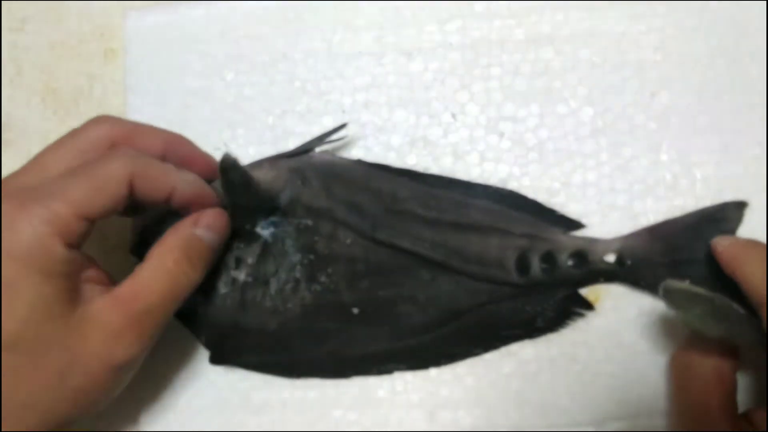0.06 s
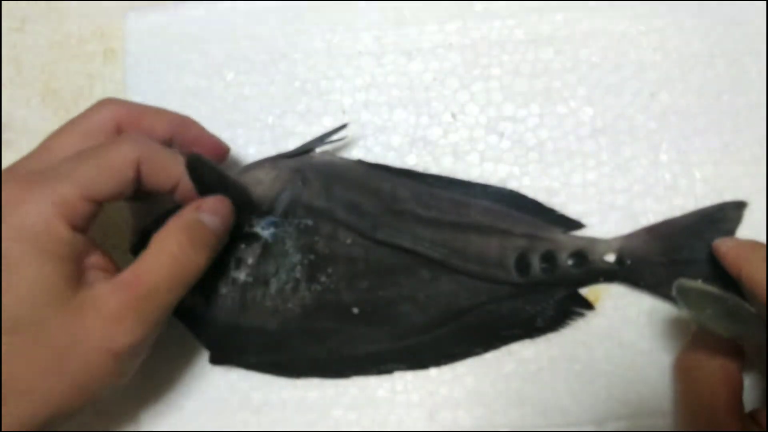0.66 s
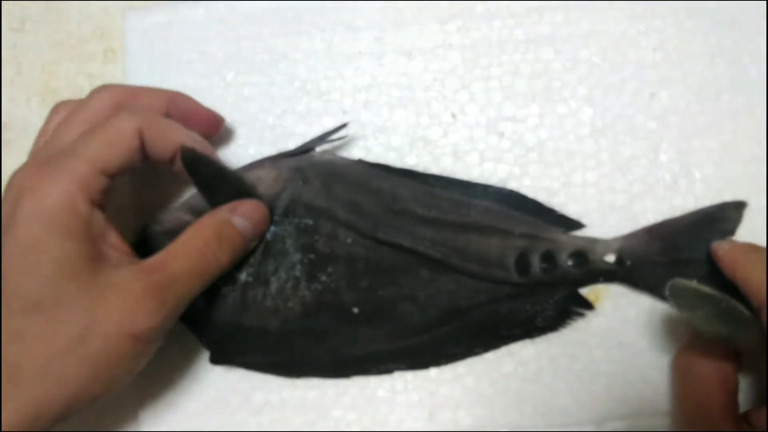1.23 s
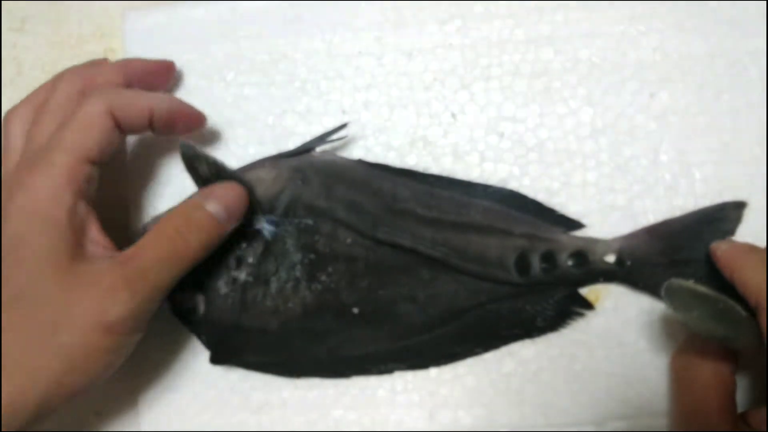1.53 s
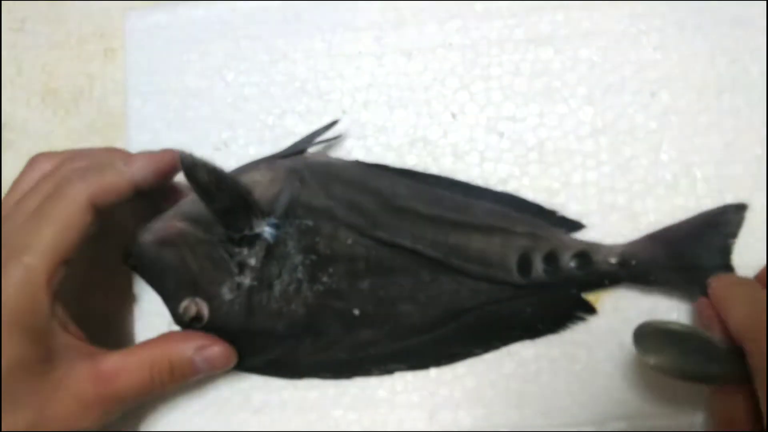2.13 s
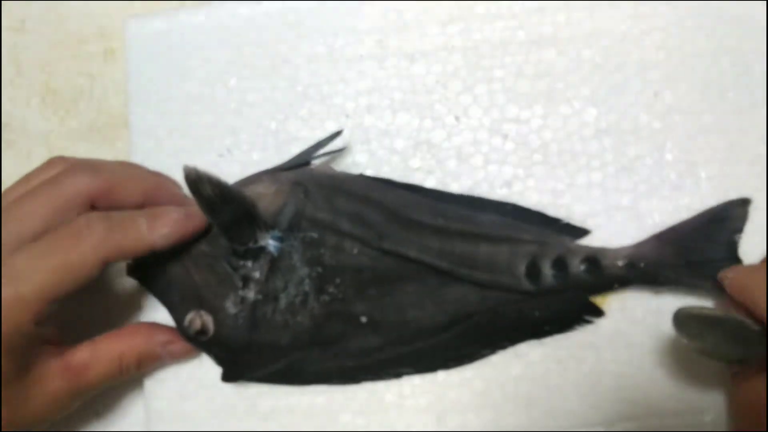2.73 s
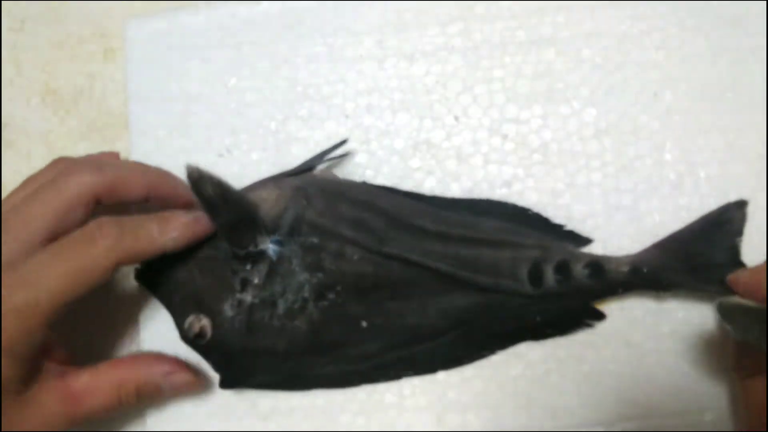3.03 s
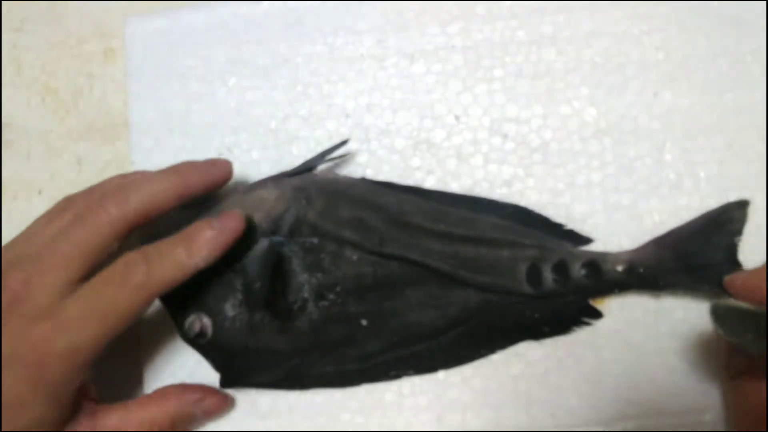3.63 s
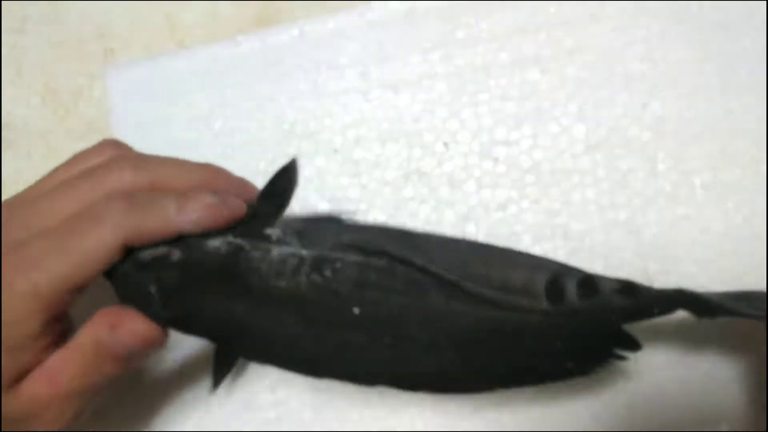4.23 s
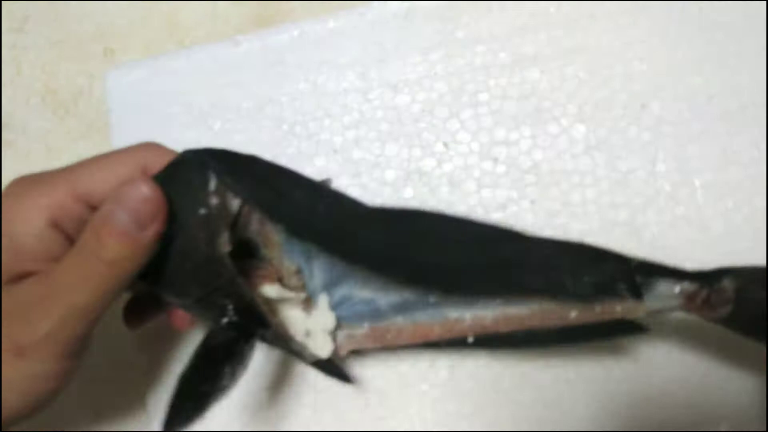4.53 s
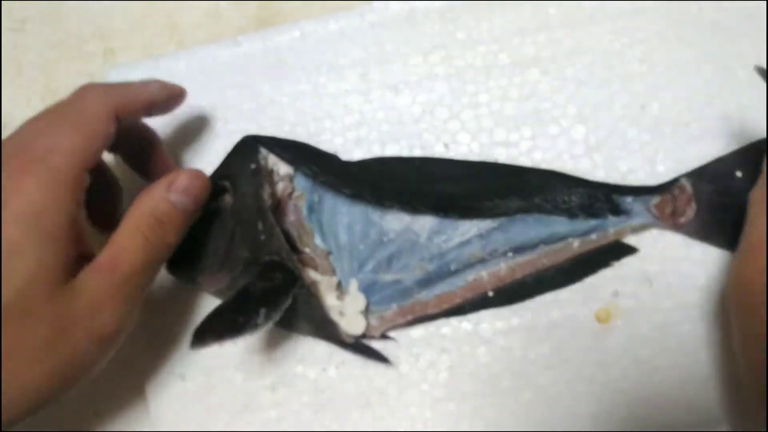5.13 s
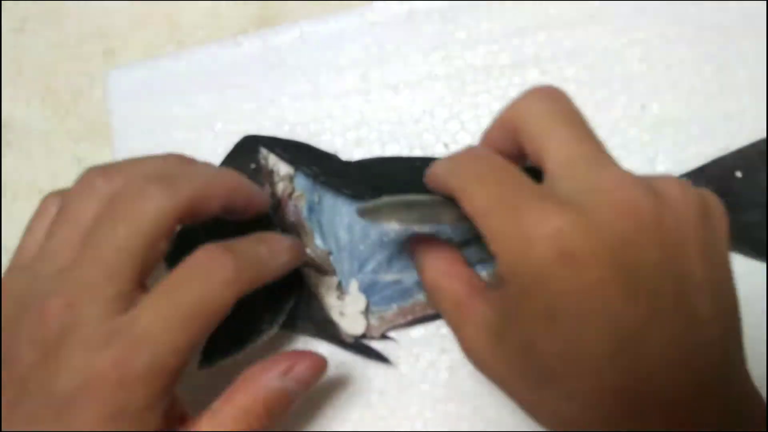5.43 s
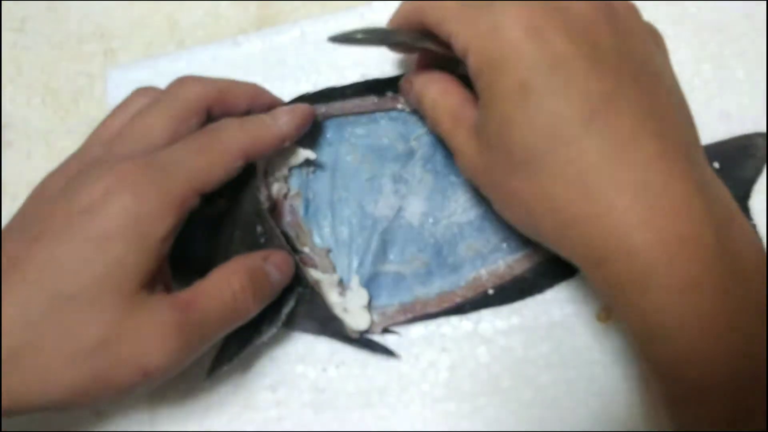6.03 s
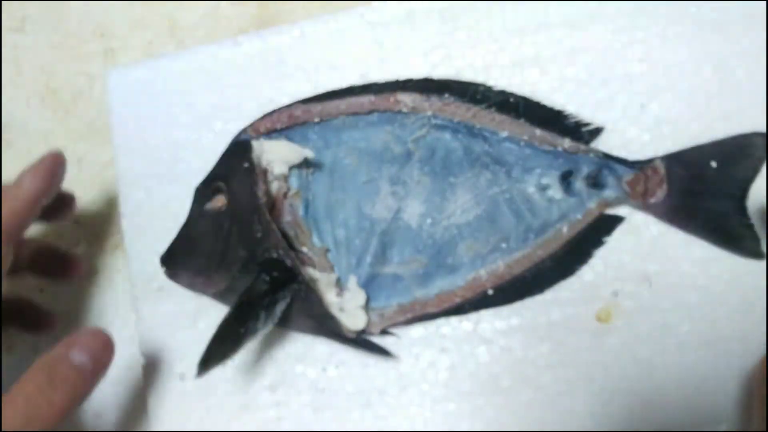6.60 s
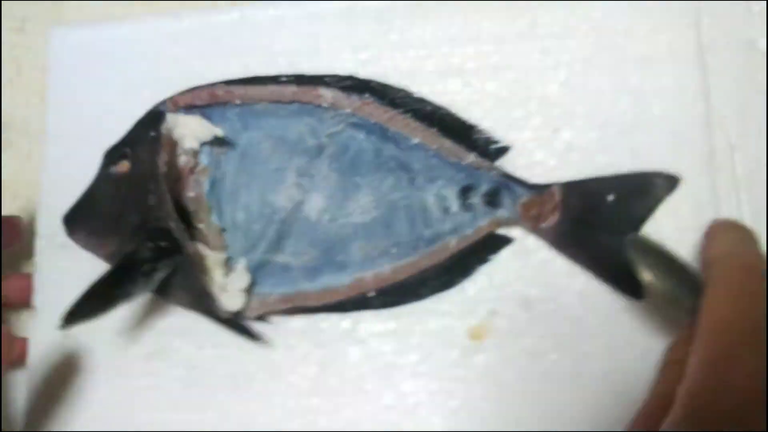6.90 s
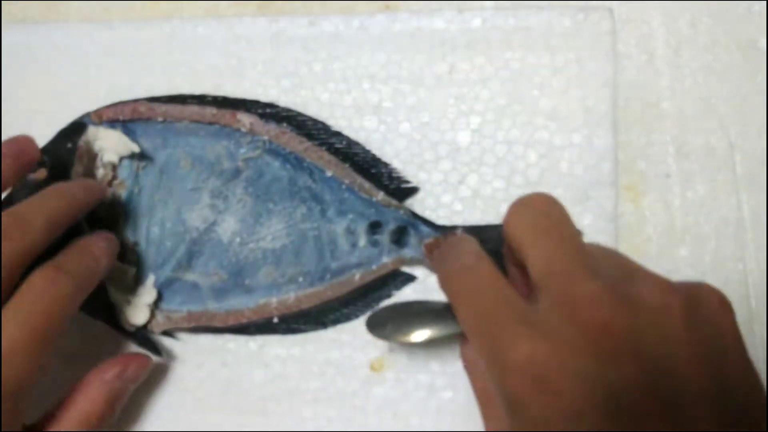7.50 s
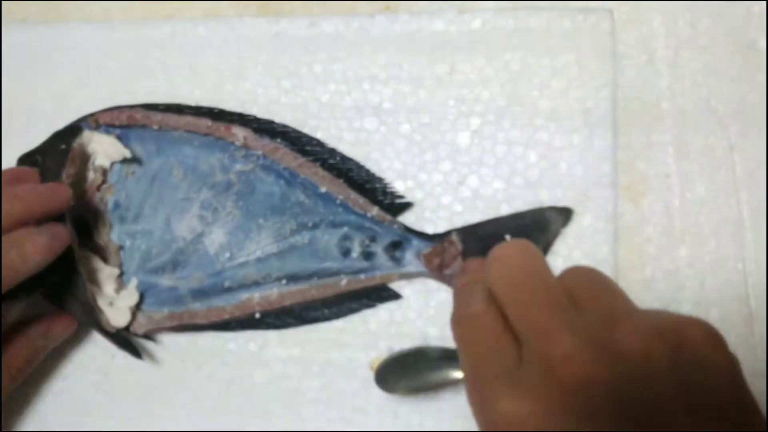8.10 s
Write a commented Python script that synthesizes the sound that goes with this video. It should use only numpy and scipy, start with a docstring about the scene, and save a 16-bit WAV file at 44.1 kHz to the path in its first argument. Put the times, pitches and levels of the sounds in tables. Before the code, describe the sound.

In a small, quiet room, fingers rub the sandpapery skin of a fish lying on a foam board, making short, high, crackly rasps. Fins and wet flesh give sharp ticks as it is turned over. Near the end the board is shoved across the counter with a louder gritty scrape and faint squeaks, then the rubbing resumes. The sounds are close, over soft room air, low rumble and a faint hum.

```python
"""Handling a fish on a foam board

In a small, quiet room, fingers rub a fish's sandpapery skin and flip it over. Fins and wet flesh tick,
and the foam board is shoved across the counter, squeaking now and then. Each rub or shove is a shower
of tiny slips that hiss and make the foam ring. Room air, a low rumble and a faint hum lie beneath."""
import sys
import numpy as np
from scipy import signal
from scipy.fft import rfft, irfft, next_fast_len
from scipy.io import wavfile
from scipy.ndimage import uniform_filter1d, map_coordinates

SR = 44100
rng = np.random.default_rng(int(sys.argv[2]) if len(sys.argv) > 2 else 0)


def put_to_file(sound):
    """Save the sound as 16-bit audio at rate SR, in the file named by the first command-line argument."""
    columns = np.atleast_2d(sound).T  # one column per channel
    safe = np.clip(columns, -1, 1)
    whole_steps = np.round(safe * 32767)
    wavfile.write(sys.argv[1], SR, whole_steps.astype(np.int16))


N = 368235

# Finger strokes; a harder press brings out more foam
# (start [s], length [s], rasp level [dB], foam compared with rasp [dB])
FINGER_RUBS = [(0.0, 0.052, -70, -4), (0.115, 0.138, -66, -5), (0.832, 0.075, -68.5, 0.5),
               (0.928, 0.061, -57.5, -2.0), (1.016, 0.056, -52.5, -4.5), (1.095, 0.039, -49, -4.5),
               (1.162, 0.13, -64, -1.5), (1.581, 0.039, -45, -13.5), (1.768, 0.033, -55, -7),
               (1.883, 0.089, -48, -8.5), (1.92, 0.21, -48.5, -7.5), (2.044, 0.021, -37.5, -12.5),
               (2.156, 0.088, -53, -7.5), (2.25, 0.24, -55.5, -5), (2.526, 0.032, -48, -5.5),
               (2.557, 0.13, -52.5, -6.5), (2.77, 0.13, -63, -5), (2.902, 0.054, -57.5, -0.5),
               (2.994, 0.12, -58.5, -11), (3.104, 0.039, -52.5, -3), (3.139, 0.129, -49.5, -6.0),
               (3.283, 0.087, -57.5, -1.5), (3.352, 0.02, -46.5, -8.5), (3.561, 0.039, -68.5, 1),
               (3.687, 0.17, -59.5, -3), (3.811, 0.071, -50.5, -6.0), (3.88, 0.11, -48, -5),
               (3.99, 0.19, -56, -6), (4.204, 0.057, -48, -8.5), (4.289, 0.031, -38.5, -14),
               (4.31, 0.051, -50.5, -7), (4.415, 0.028, -63.5, -10), (4.578, 0.032, -65, -30),
               (4.741, 0.053, -66, -7.5), (4.818, 0.088, -53, -8.0), (4.893, 0.26, -52, -2.0),
               (5.005, 0.2, -39.5, -11.5), (5.385, 0.017, -67, -19), (5.612, 0.13, -62, -4),
               (5.74, 0.49, -59.5, -5), (6.085, 0.2, -48.5, -5), (6.222, 0.064, -46.5, -24),
               (6.27, 0.095, -53.5, -4.5), (6.355, 0.081, -46.5, -11.5), (7.29, 0.18, -73, 4),
               (7.41, 0.092, -63, 1.5), (7.525, 0.1, -50.5, -5.5), (7.624, 0.089, -47, -6),
               (7.728, 0.12, -51.5, -6), (7.868, 0.12, -53, -6), (7.992, 0.104, -47.5, -5),
               (8.12, 0.19, -58.5, -5.5)]
# Pushes of the board over the counter
# (start [s], length [s], grit level [dB], foam compared with grit [dB], bending compared with foam [dB])
BOARD_SHOVES = [(2.366, 0.061, -39.5, -4.5, -25), (6.685, 0.026, -39.5, -9, -13.5),
                (6.733, 0.048, -33, -9.5, -17.5), (6.816, .1, -30.5, -9.5, -19.5),
                (6.9, 0.15, -30.5, -12, -19.5), (7.051, 0.12, -34, -15, -9), (7.153, 0.068, -34, -9, -21)]
# Fins flicking, wet flesh letting go, foam breaking loose
# (time [s], level [dB], foam knock compared with level [dB], time to fade by 60 dB [s])
SHARP_TICKS = [(0.990, -40, -12, .007), (1.586, -38, -15, .06), (1.6105, -23, -13, 0.0037),
               (1.636, -25, -23, .007), (1.783, -36.5, -8, .015), (1.864, -37, -8, 0.075),
               (1.904, -26, -10, 0.076), (2.054, -28, -20, .03), (2.062, -22, -7.5, .007),
               (2.543, -37, -10, .05), (2.9, -35, -10, .007), (3.058, -36, -22, .007),
               (3.115, -32, -7, 0.016), (3.371, -21, -16, 0.009), (3.602, -45, -12, .007),
               (3.713, -37, -7, 0.032), (4.298, -22, -16, 0.057), (4.31, -18, -13, 0.011),
               (4.616, -40, -24, .007), (4.785, -43, 1, .007), (5.384, -35.5, -18, 0.014),
               (5.529, -39, -19, 0.098), (5.606, -40, -23.5, 0.0076), (5.973, -35, -11, .009),
               (6.694, -21.5, -20, 0.096), (6.744, -24, -11, .05), (6.9527, -14, -28, .003),
               (7.108, -22, -27, 0.014), (7.414, -30.5, 2, 0.013), (7.426, -25, -14, .007)]
# The foam catching and squeaking (start [s], pitch [Hz], length [s], level [dB])
FOAM_SQUEAKS = [(1.581, 2520, 0.078, -58), (1.905, 2470, 0.01, -51), (2.02, 2560, 0.017, -50.5),
                (2.18, 1710, 0.031, -54.5), (4.22, 1445, 0.041, -56), (4.31, 1114, 0.05, -56.5),
                (6.131, 1750, 0.057, -57), (6.691, 1104, 0.027, -51), (6.81, 950, 0.04, -54),
                (7.023, 993, 0.038, -46.5), (7.028, 786, 0.17, -54.5), (7.183, 1084, 0.056, -46.5),
                (8.033, 1315, 0.071, -48.5), (8.04, 2184, 0.063, -52.5)]

# The tone of each sound: how strong it is from low to high (frequency [Hz], relative level [dB])
SKIN_TONE = [(3530, -49), (6000, -13.5), (6690, -20.5), (8360, -12.5), (10300, -7), (11300, -0.5),
             (11800, 0), (14000, -11.5), (15200, -12), (15800, -26.5)]  # rasping skin
GRIT_TONE = [(3530, -62), (6000, -20.5), (6560, -29.5), (7030, -18.5), (8640, -15), (10400, -7), (11700, 1),
             (14000, -11.5), (15200, -11), (15800, -29)]  # foam scraping the counter
PRESSED_FOAM_TONE = [(500, -15), (850, -8.5), (1150, 1), (1700, 0.5), (2000, -3), (2350, 0.5), (3100, -3.5),
                     (4200, -4), (5000, -4.5), (5800, -11), (6600, -9.5), (9000, -30)]  # the sheet under the fingers
SLIDING_FOAM_TONE = [(550, -27), (700, -21), (790, -0.5), (950, -2.5), (1100, -0.5), (1650, 2), (2050, -1),
                     (2400, 0.5), (4200, -1.5), (4900, -1), (5900, -8), (6600, -11), (9000, -32)]  # the sheet sliding freely
BENDING_TONE = [(110, -13.5), (230, -5), (340, 0), (480, -5), (680, -6.5), (1100, -19)]  # the whole board bending
AIR_TONE = [(76, -44.5), (130, -9), (169, 1), (263, -4), (296, -5.5), (362, -8), (452, -7), (746, -10.5),
            (792, -10), (1050, -11), (5130, -17), (9000, -18), (15800, -12.5)]  # room air
DRAUGHT_TONE = [(8.8, -28.5), (15, 7), (23, 0), (36, -9.5), (65, -18), (105, -21), (135, -31.5),
                (160, -37.5), (210, -42.5), (350, -120)]  # a rumbling draught
# How long the room rings (frequency [Hz], time to fade by 60 dB [s])
ROOM_FADE = [(200, 0.065), (2000, 0.1), (12000, 0.09)]

GRIP_DB = -76.5  # faint rasp of fingers that just hold the fish
TOP_HZ = 15800


def rubbing(rasp_gain, foam_gain):
    """Rough, damp skin rasps and crackles under the fingers and shakes the foam below it."""
    contact = slips(per_s=2800, spread_db=1.0, clump_db=0.56, smooth=0.9)
    creep = 1 / (1 + rasp_gain / amp(-54.5))  # slow contact sticks, a fast slide runs evenly
    sticky = creep * crackle(per_s=62, spread_db=11.5, fade_s=0.0022)
    rasp = coloured((amp(-0.83) * contact + amp(-6.5) * sticky) * (rasp_gain + amp(GRIP_DB)), SKIN_TONE)
    foam = coloured((amp(-0.68) * contact + amp(-7.5) * sticky) * foam_gain, PRESSED_FOAM_TONE)
    return rasp + shifting_grip(foam, depth_db=2.18)


def shoving(grit_gain, foam_gain):
    """Foam beads judder over the counter; the free sheet rings lower than when it is pressed."""
    contact = slips(per_s=5000, spread_db=3.0, clump_db=0.9, smooth=0.75)
    grit = amp(-0.2) * coloured(contact * grit_gain, GRIT_TONE)
    foam = amp(-1.0) * coloured(contact * foam_gain, SLIDING_FOAM_TONE)
    return grit + shifting_grip(foam, depth_db=1.5)


def ticks():
    """Something snaps free, crumbles briefly and knocks on the foam."""
    snaps, knocks = np.zeros(N + SR), np.zeros(N + SR)
    t = np.arange(SR // 12) / SR
    for start, db, knock_db, fade_s in SHARP_TICKS:
        release = 0.17 * rng.standard_normal(len(t)) * amp(-60 * t / fade_s)
        release[0] = 1  # the snap itself
        snaps[round(start * SR):][:len(t)] += amp(db) * release
        knocks[round(start * SR):][:len(t)] += amp(db + knock_db) * release
    return amp(1.0) * coloured(snaps[:N], SKIN_TONE) + coloured(knocks[:N], PRESSED_FOAM_TONE)


def squeaks():
    """The foam sticks and slips in time with one of its own notes, unsteady in pitch and strength."""
    out = np.zeros(N)
    waver = 1 + 0.04 * wobble(350)
    strength = amp(3.9 * wobble(250))
    for start, hz, length, db in FOAM_SQUEAKS:
        span = np.arange(round(start * SR), round((start + length) * SR))
        tone = np.sin(2 * np.pi * np.cumsum(hz * waver[span]) / SR)
        out[span] += amp(db) * np.hanning(len(span)) * strength[span] * tone
    return out


def bending(weight_gain):
    """Dragged weight bends the whole board with a dull grumble."""
    contact = slips(per_s=1500, spread_db=4.5, clump_db=3.1, smooth=1.0)
    return amp(0.5) * coloured(contact * weight_gain, BENDING_TONE)


def strokes(rows, rise_share, fade_db_per_s):
    """Each stroke speeds up, holds and dies away. Gives one loudness curve for each dB column."""
    t = np.arange(N) / SR
    power = np.zeros((len(rows[0]) - 2, N))
    for start, length, *steps_db in rows:
        span = slice(*np.searchsorted(t, [start, start + length + .5]))
        age = t[span] - start
        rise = np.clip(age / (rise_share * length), 0, 1)
        fade = amp(-fade_db_per_s * np.maximum(age - length, 0))
        layer_gains = amp(np.cumsum(steps_db))  # each level counts from the one before
        power[:, span] += np.outer(layer_gains, rise * fade) ** 2
    return np.sqrt(power)


def slips(per_s, spread_db, clump_db, smooth):
    """Tiny slips of uneven size come in clumps, over a smoother sliding hiss."""
    sizes = amp(spread_db * np.clip(rng.standard_normal(N), -2, 2)) * rng.choice([-1, 1], N)
    grains = unit(sizes * (rng.random(N) < per_s / SR))
    catch = amp(clump_db * (wobble(190) + 0.78 * wobble(45)))  # the contact catches and frees
    return unit(catch * (grains + smooth * rng.standard_normal(N)))


def crackle(per_s, spread_db, fade_s):
    """Sticky spots let go here and there, each sudden and quick to fade."""
    starts = (rng.random(N) < per_s / SR) * amp(spread_db * rng.uniform(-0.35, 1, N))
    fade = np.exp(-np.arange(SR // 20) / (SR * fade_s))
    return unit(signal.fftconvolve(starts, fade)[:N] * rng.standard_normal(N))


def shifting_grip(x, depth_db):
    """A moving grip changes which notes of the foam sheet stand out."""
    bands = signal.stft(x, nperseg=512)[2]
    drift = uniform_filter1d(rng.standard_normal(bands.shape), size=3, axis=0)  # smooth over pitch
    drift = uniform_filter1d(drift, size=16, axis=1)  # and over time
    return signal.istft(bands * unit(amp(depth_db * unit(drift))), nperseg=512)[1][:N]


def room(x, echo_s, echo_db, tail_db, positions=28):
    """The direct sound, one clear echo and a short tail that changes as the point of contact moves."""
    hz, t, noise = signal.stft(rng.standard_normal((positions, SR // 3)), SR, nperseg=256)
    fade = amp(-60 * t / along(ROOM_FADE, hz)[:, None])
    tails = signal.istft(noise * fade, SR, nperseg=256)[1]
    ringing = np.zeros(N + SR)
    for span, tail in zip(np.array_split(np.arange(N), positions), tails):
        answer = signal.fftconvolve(x[span], tail / np.linalg.norm(tail))
        ringing[span[0]:][:len(answer)] += answer
    echo = np.pad(x, (round(echo_s * SR), 0))[:N]
    mix = x + amp(echo_db) * echo + amp(tail_db) * ringing[:N]
    return mix / np.linalg.norm(amp([0, echo_db, tail_db]))


def background():
    """Room air, the low rumble of a draught and the wavering hum of an appliance."""
    air = amp(-66.5) * coloured(rng.standard_normal(N), AIR_TONE)
    swell_db = 9 * np.exp(-((np.arange(N) / SR - 3.054) / 0.14) ** 2)  # the hand passes at about 3 s
    rumble = amp(-50.5 + swell_db) * coloured(rng.standard_normal(N), DRAUGHT_TONE)
    hum_hz = 101 + 2.47 * wobble(7.8)
    hum = amp(-74.0 + 2.8 * wobble(4.2)) * np.sin(2 * np.pi * np.cumsum(hum_hz) / SR)
    return air + rumble + hum


def amp(db):
    """Turn decibels into a number to multiply by."""
    return 10 ** (np.asarray(db) / 20)


def unit(x):
    """Scale a signal to an average power of 1."""
    return x / np.sqrt(np.mean(x ** 2) + 1e-20)


def along(points, hz):
    """Read between the rows of a frequency table, with octaves evenly spaced."""
    frequencies, values = np.transpose(points)
    return np.interp(np.log(hz + 1), np.log(frequencies + 1), values)


def wobble(per_s):
    """A smooth curve through per_s random values a second."""
    return map_coordinates(rng.standard_normal(int(N * per_s / SR) + 4), [np.arange(N) * per_s / SR])


def coloured(x, tone):
    """Give x the tone in a table; plain hiss keeps its overall power."""
    size = 2 * next_fast_len(N // 2 + SR // 4)
    hz = np.fft.rfftfreq(size, 1 / SR)
    gain = unit(amp(np.maximum(along(tone, hz), -100)))
    # fold the filter in time, so it rings only after each sound, never before
    folded = irfft(np.log(gain))
    folded[1:size // 2] *= 2
    folded[size // 2 + 1:] = 0
    return irfft(rfft(x, size) * np.exp(rfft(folded)), size)[:N]


def scene():
    """The fish and the board sound in the room, over its background."""
    uneven = amp(0.84 * wobble(28))  # a finger never slides quite evenly
    rasp, pressed = strokes(FINGER_RUBS, rise_share=0.39, fade_db_per_s=330) * uneven
    grit, sliding, dragged = strokes(BOARD_SHOVES, rise_share=0.45, fade_db_per_s=327)
    pressure = pressed / (rasp + amp(GRIP_DB))
    finger_weight = amp(-7.5) * pressed * pressure ** 0.58  # light flicks hardly bend the board
    weight = np.hypot(finger_weight, dragged)
    handling = rubbing(rasp, pressed) + shoving(grit, sliding) + squeaks() + bending(weight) + ticks()
    return (room(handling, echo_s=.0127, echo_db=-19, tail_db=-7) + background())[None]


def record(dry):
    """Cut away the highest treble, above TOP_HZ."""
    size = next_fast_len(N + SR // 2)
    kept = np.fft.rfftfreq(size, 1 / SR) < TOP_HZ
    return irfft(rfft(dry, size) * kept, size)[..., :N]


dry = scene()
out = record(dry)
put_to_file(out)
```